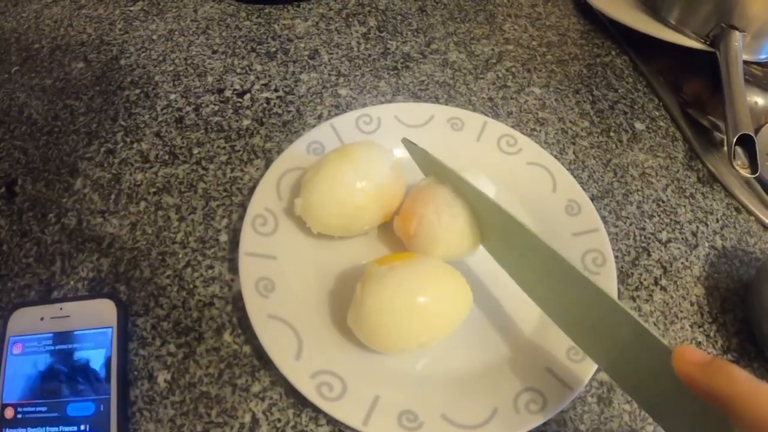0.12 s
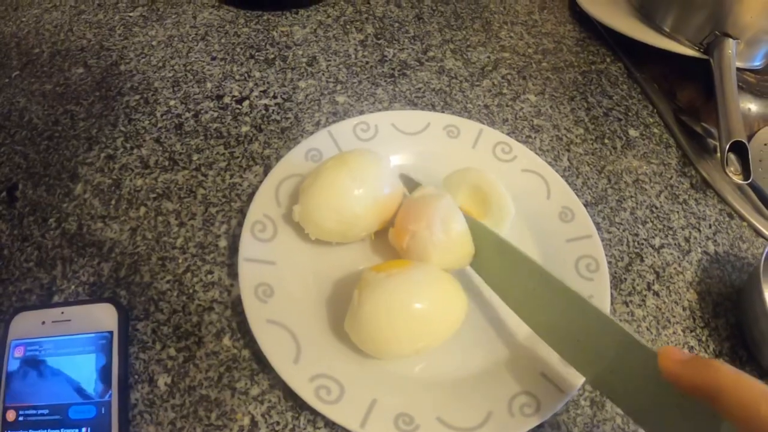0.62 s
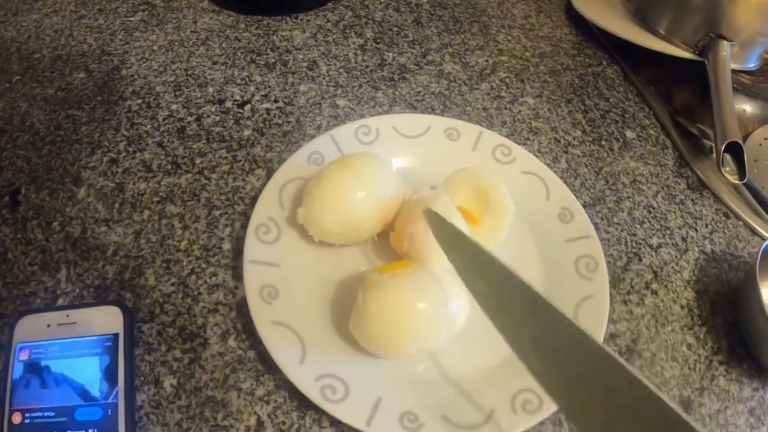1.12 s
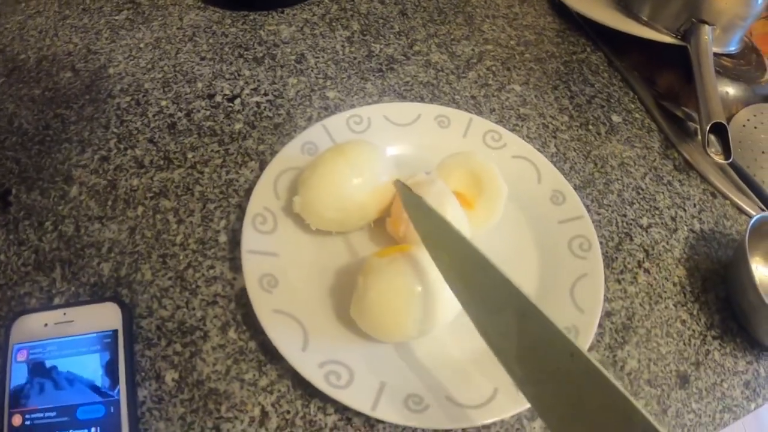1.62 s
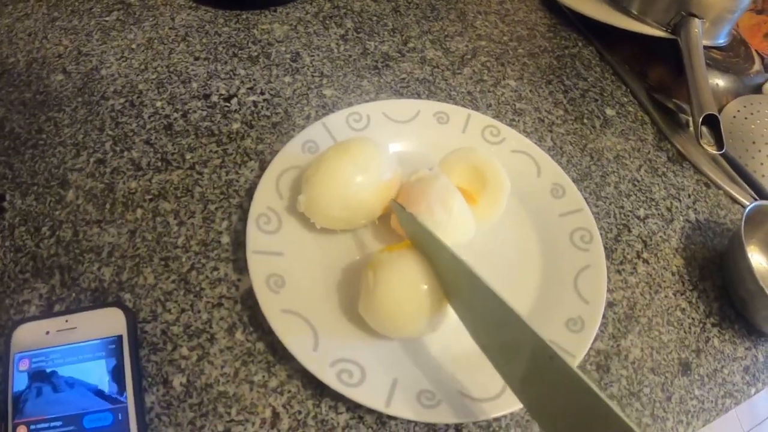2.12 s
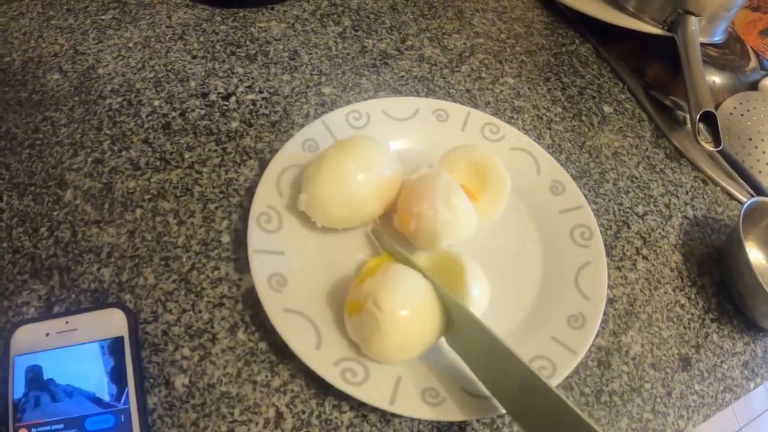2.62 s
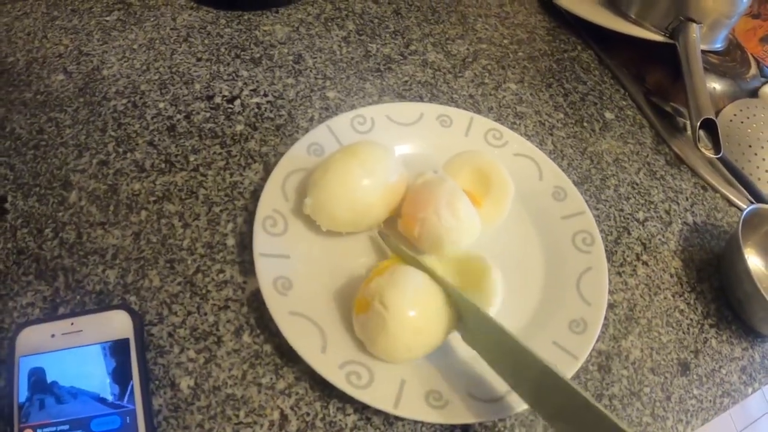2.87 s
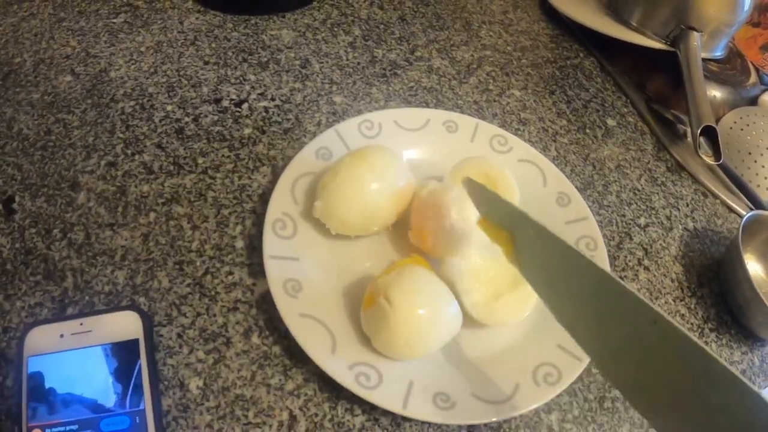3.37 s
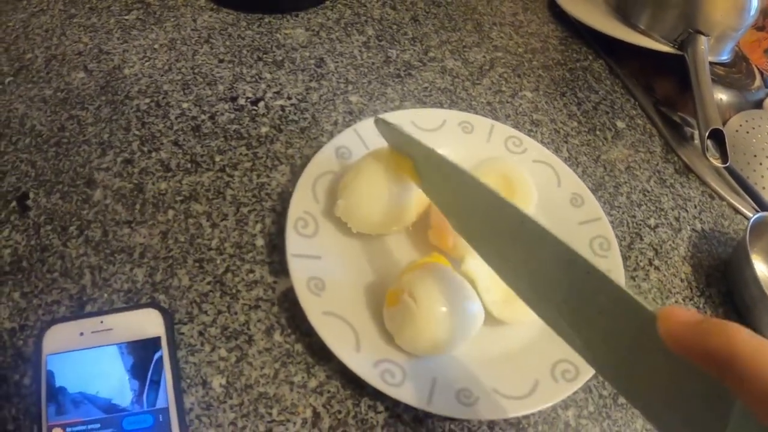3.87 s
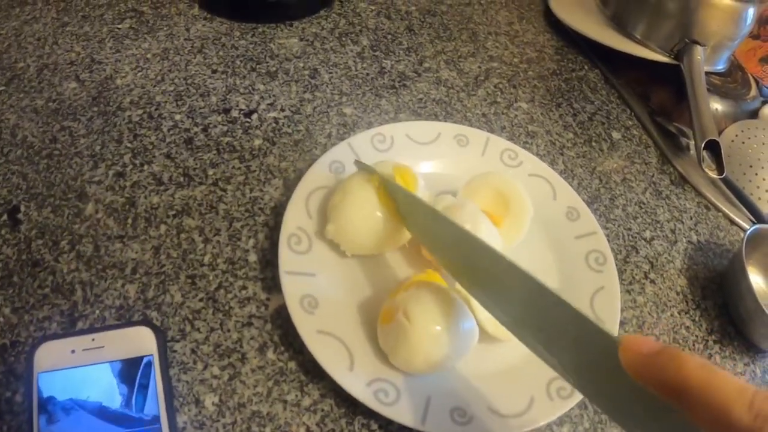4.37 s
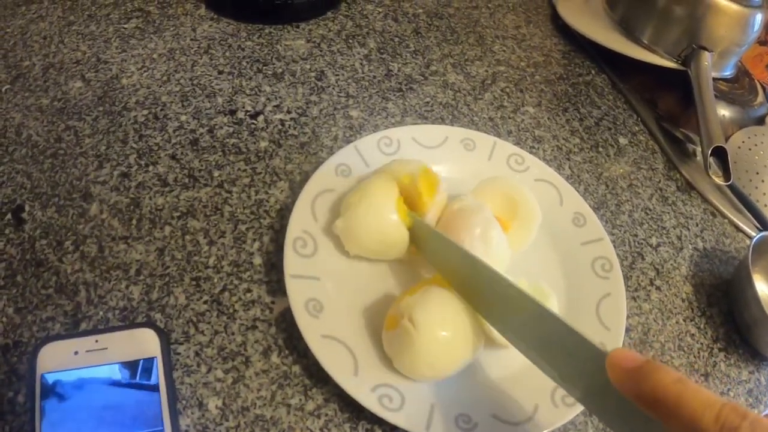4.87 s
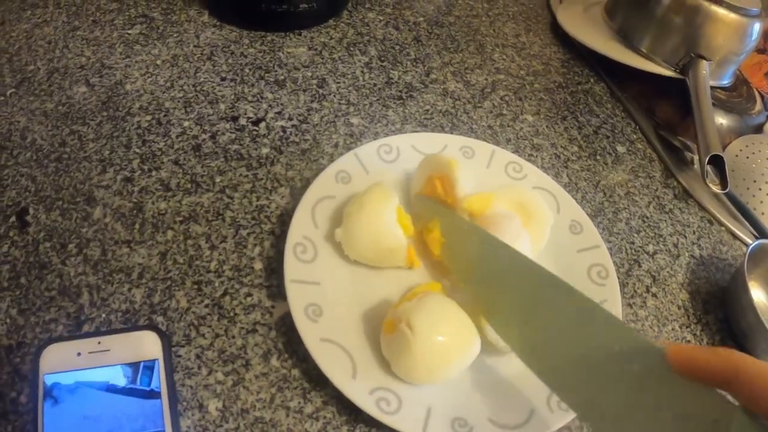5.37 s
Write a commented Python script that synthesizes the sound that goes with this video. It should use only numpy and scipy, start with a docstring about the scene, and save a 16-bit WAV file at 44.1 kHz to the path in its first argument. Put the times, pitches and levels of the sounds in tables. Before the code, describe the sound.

A close, body-worn microphone picks up soft low bumps and rustle over continuous pan sizzle from across the kitchen. A piercing, overloaded plate clink comes early and the frying dips briefly behind it; a faint brush against egg follows. Later come a ringing clink and a quick pair of clinks, then a tiny high squeak and a deep door boom with rattle.

```python
"""Onions sizzle in a pan across a small kitchen: dense noise with crackles and spits, coloured and reverberant.
A knife slices boiled eggs and clinks four times on a ceramic plate: a crack, briefly damped modes and weaker
ringing ones; the blade skids into the first clink, and a ringing noise swells into the third.
At the end a hinge squeaks by stick-slip and a door thumps shut, as low modes under a clatter.
A small microphone worn by the cook rumbles with body movement, clips at full scale and ducks after loud blows."""
import sys
import numpy as np
from scipy import signal
from scipy.fft import rfft, irfft, next_fast_len
from scipy.io import wavfile
from scipy.ndimage import uniform_filter1d

SR = 44100
rng = np.random.default_rng(int(sys.argv[2]) if len(sys.argv) > 2 else 0)


def output_pcm(signal):
    """Save a mono or channel-first signal as 16-bit PCM at the path in sys.argv[1].

    Samples are clipped to [-1, 1] before scaling.
    """
    pcm = np.clip(np.atleast_2d(signal).T, -1, 1) * 32767
    wavfile.write(sys.argv[1], SR, np.round(pcm).astype(np.int16))


def gain_from_db(level_db):
    """Convert decibel levels to linear amplitude factors (20 dB per decade)."""
    decades = np.asarray(level_db, float) / 20
    return 10 ** decades


N = 242764

# spectrum of the frying: f/Hz, relative level/dB
SIZZLE_SPECTRUM = [(120, -24), (270, -6), (480, -12), (750, -11.5), (1320, -2.5), (2000, -3), (3000, -2.5),
                   (4500, -0.5), (5400, 0.5), (6500, -5.5), (7400, -15), (8500, -23), (12400, -23.5),
                   (15400, -34.5)]
# level of the frying as heard, dipping after the first clink and slowly recovering: t/s, level/dB
SIZZLE_LEVEL = [(0.0, -39), (0.25, -39), (0.55, -42.5), (0.8, -43), (1.1, -41.5), (2.7, -39), (3.5, -38.5),
                (4.3, -38.5), (4.95, -35.5), (5.5, -41)]
# tone balance of the crackle, slightly fuller in the bass: f/Hz, level/dB
CRACKLE_TILT = [(300, 3), (3000, 0.5), (9000, 1.0)]
# loudest spits of fat: t/s, relative level/dB
SPITS = [(0.8926, -22.5), (1.477, -20), (1.7076, -21.5), (2.1307, -22), (2.2057, -21), (2.4252, -23.5),
         (2.729, -20.5), (2.915, -24.5), (3.0099, -22.5), (3.2503, -21.5), (3.3292, -20), (3.4253, -18.5),
         (3.4897, -24.5), (3.5295, -23.5), (3.7176, -21), (3.8215, -21.5), (4.1983, -24)]
# treble of a spit against its bass: f/Hz, level/dB
SPIT_TILT = [(1000, 0), (9000, 6.5)]
# knife landings: t/s, blow level/dB, damping time of blade and egg/s, crack level/dB, counter thud level/dB,
# time until the ring is stopped/s
LANDINGS = [(0.3218, 7.5, 0.0045, -16, -38.5, 0.24), (2.6126, -12.5, 0.0087, -14.5, -31, 0.2),
            (4.8731, -12, 0.0078, -18.5, -31.5, 0.13), (5.0478, -15, 0.006, -27, -68, 0.092)]
# plate modes that blade and egg damp at once: f/Hz, level/dB against the blow at each of the four landings,
# which differ as the place struck changes
DAMPED_MODES = [(780, -25.5, -10, -11.5, -18), (1264, -25, -21, -7.5, -36), (1550, -35, -13, -5.5, -29),
                (1820, -50, -29, -22, -2), (2350, -22, -6, -3, -1.5), (2740, 1, 6.5, 2, -0.5),
                (2970, -8, -5.5, -4, -6), (3340, -39, -19, 3, -19), (3647, -18.5, 0.5, -27, -16),
                (4360, -37, -9, -29, -30), (4590, -36, -1.5, -1, -8), (5160, -33, -11, -36, -24)]
# weaker plate modes that ring on: f/Hz, T60/s, level/dB against the blow at each of the four landings
RINGING_MODES = [(851, 1.2, -69, -31, -27, -35), (1570, 0.2, -58, -26, -10, -22),
                 (1860, 0.39, -50, -31, -36, -16.5), (2380, 0.25, -49, -11, -34, -28),
                 (2584, 0.92, -41.5, -37, -43, -48), (2660, 2.9, -36.5, -25, -40, -45),
                 (2680, 1, -38, -31, -32, -45), (2717, 0.63, -36, -22, -41, -38),
                 (2790, 0.57, -39, -27, -40, -38), (2950, 0.51, -40, -24, -18, -40),
                 (3490, 0.22, -58, -31, -12, -20), (3590, 0.5, -63, -15, -34, -40),
                 (3640, .25, -60, -24, -36, -40), (3200, .3, -52, -28, -32, -40),
                 (4360, 1.1, -46, -40, -43, -40), (4600, 0.8, -50, -41, -23, -39),
                 (4663, 0.22, -51, -23.5, -23, -28), (6020, 0.8, -44, -43, -24, -40),
                 (6160, 0.4, -55, -25, -43, -45), (7300, 0.15, -70, -36, -34, -50),
                 (9300, 0.093, -72, -31, -45, -55), (10600, 1.2, -87, -62, -60, -60)]
# spectrum of the crack: f/Hz, relative level/dB
CRACK_SPECTRUM = [(200, -49), (700, -16.5), (2500, 8), (5000, 5), (6500, -4.5), (8000, -43)]
# spectrum of the counter's thud: f/Hz, relative level/dB
COUNTER_SPECTRUM = [(100, -1), (250, 14), (450, 12), (900, 6), (1600, 7.5), (3000, -49)]
# noise growing into a clink, first a skid of the blade on the glaze, later a faint ringing swell:
# start t/s, end t/s, level at the end/dB, rise/dB
SWELLS = [(0.292, 0.3245, -9.5, 37), (4.855, 4.887, -31, 6)]
# narrow rings in that noise: f/Hz, bandwidth/Hz, relative level/dB in the skid, relative level/dB in the later swell
SWELL_RINGS = [(2780, 1000, 2.5, 0), (4160, 78, -4, -14), (4440, 840, -1, -11), (4405, 120, -1, 6),
               (6570, 150, -3, -16), (6520, 170, 9.5, -25)]
# the blade brushes an egg: t/s, level/dB, T60/s
TOUCH = (0.853, -41, .22)
# spectrum of that brush: f/Hz, relative level/dB
BRUSH_SPECTRUM = [(400, -32), (800, 0), (1400, 0), (2200, -6), (4000, -28)]
# radiation of the slips by door and hinge plate: f/Hz, level/dB
HINGE_RADIATION = [(995, -32), (1012, -30), (1042, -48), (1054, -30), (1085, -28), (1130, -38), (1995, -38),
                   (2012, -30), (2034, -20), (2066, -20), (2108, -30), (2165, -27), (2240, -42),
                   (2990, -36), (3045, -23), (3100, -26), (3155, -45), (3210, -33), (3270, -50),
                   (4080, -40), (4280, -36), (4360, -52), (5085, -37), (5250, -40), (5370, -52)]
# door meets frame and rebounds: t/s, level/dB
SLAMS = [(5.293, -2), (5.328, -4.5), (5.354, -2.5)]
# modes of panel and room: f/Hz, level/dB against the slam, T60/s
DOOR_MODES = [(12.6, -22, .9), (31.7, -13.5, 1.33), (54, -3, 0.39), (67, -10, 0.39), (84.6, -16, 0.31),
              (99.3, -9.5, 0.83), (123.2, -15, 0.44), (171, -38, 1.8), (247, -36, 0.53), (270, -25.5, 0.52),
              (318, -24, 0.37), (370, -30, 0.33), (471.5, -21.5, 0.37), (975, -18, 0.23), (1046, -18, 0.23),
              (1710, -8.5, 0.085)]
# spectrum of the clatter: f/Hz, relative level/dB
RATTLE_SPECTRUM = [(71, -27), (120, -6.5), (160, -5), (567, -12), (908, -15.5), (1010, -11), (1330, -15),
                   (2240, -20.5), (3040, -19), (6270, -31), (9000, -62), (11700, -93), (19800, -120)]
# jolts of the microphone mount: start t/s, length/s, wobble level/dB, rustle level/dB
JOLTS = [(0.135, .2, -30, -40.5), (0.304, 0.091, -38, -33.5), (0.362, 0.19, -37.5, -47),
         (0.578, 0.12, -36.5, -66), (1.088, .2, -32, -45.5), (1.35, 0.22, -32.5, -50),
         (1.608, 0.25, -31.5, -50.5), (1.852, .08, -37, -59), (1.956, 0.065, -38, -53),
         (2.018, .12, -35.5, -54), (2.145, 0.12, -38.5, -76), (2.303, 0.11, -41, -68),
         (3.043, .1, -39.5, -53), (3.429, .08, -47, -51.5), (3.589, .09, -46, -67), (3.887, .1, -42.5, -59),
         (4.335, .12, -43, -68), (4.5, .1, -47, -48), (4.75, 0.1, -45.5, -54), (4.85, .1, -53, -41.5)]
# spectrum of the low body thud: f/Hz, relative level/dB
THUD_SPECTRUM = [(5, -4), (18, 7.0), (35, 14.0), (55, -11.0), (80, -19), (200, -96)]
# spectrum of the rustle: f/Hz, relative level/dB
RUSTLE_SPECTRUM = [(30, -6), (70, -6), (100, 1.5), (160, -2.0), (350, -14.5), (900, -43.5)]
# reverberation time of the kitchen: f/Hz, T60/s
ROOM_T60 = [(250, 1), (700, 0.96), (2500, 1), (6000, 0.64), (12000, 0.19)]

SQUEAK_S, SQUEAK_LENGTH_S, SQUEAK_RISE_S, SQUEAK_FALL_S = 5.228, .097, .015, .012
SLIP_END_HZ, SLIP_DROP_HZ, SLOWING_S = 960, 165, .065
SLIP_JITTER, GRIP_DB = 0.0059, 2  # rms fraction of the slip rate; rms level change
RATTLE_DB, RATTLE_GROWTH_DB, RATTLE_PEAK_S, RATTLE_T60_S = -14, 10.5, 5.338, 0.56
MOUNT_HZ, MOUNT_SPREAD, JOLT_SKEW = 33.9, 0.052, 0.75  # centre; fraction either way; below 1 peaks early
UPPER_HZ, UPPER_DB = 101.4, -1.5  # second, higher wobble; its level is relative to the rustle
CALM_THUD_DB, CALM_RUSTLE_DB, LUMPS_DB = -49, -55.5, 2.5  # movement noise without jolts
EDGE_HZ = 15650  # upper band limit


def evened(x):
    """Normalisation of signal power: scales to rms 1."""
    return x / np.sqrt(np.mean(x ** 2) + 1e-20)


def curve(rows, column=1):
    """Linear interpolation in time: a table column at every sample."""
    rows = np.asarray(rows)
    return np.interp(np.arange(N) / SR, rows[:, 0], rows[:, column])


def read(points, hz):
    """Interpolation of a spectrum on a logarithmic frequency axis."""
    f, value = np.transpose(points)
    return np.interp(np.log(hz + 1), np.log(f + 1), value)


def colour(x, points):
    """Linear filtering: multiplies the spectrum of x by a response in dB."""
    size = next_fast_len(len(x))
    response = gain_from_db(read(points, np.fft.rfftfreq(size, 1 / SR)))
    return irfft(rfft(x, size) * response, size)[:len(x)]


def add(mix, s, sound):
    """Superposition: mixes a sound in from time s."""
    part = mix[round(s * SR):][:len(sound)]
    part += sound[:len(part)]


def ring(hz, db, t60, phase=0, length=.7):
    """Free vibration of a damped mode: a sinusoid with exponential decay."""
    t = np.arange(round(length * SR)) / SR
    return gain_from_db(db - 60 * t / t60) * np.sin(2 * np.pi * hz * t + phase)


def sizzle():
    """Random superposition: dense bursting bubbles blur to patchy hiss; larger ones crackle and spit."""
    frames = N // 64 + 5
    real, imaginary, patches = rng.standard_normal((frames, 129, 3)).T
    patches = uniform_filter1d(patches, size=6, axis=0)  # across frequency
    patches = evened(uniform_filter1d(patches, size=40, axis=1))  # across time
    flicker = evened(uniform_filter1d(rng.standard_normal(frames), size=30))
    spectrum = (real + 1j * imaginary) * gain_from_db(0.3 * patches + 1.66 * flicker)
    hiss = evened(signal.istft(spectrum, nperseg=256, noverlap=192)[1][:N])

    pop_sizes = gain_from_db(4.3 * np.minimum(rng.exponential(1, N), 4))
    pops = pop_sizes * (rng.random(N) < 250 / SR)  # 250 a second on average
    t = np.arange(1500) / SR
    burst = gain_from_db(-60 * t / 0.032) + 0.086 * gain_from_db(-60 * t / 0.1)
    pop_power = signal.oaconvolve(pops ** 2, burst ** 2)[:N]
    crackle = evened(np.sqrt(abs(pop_power)) * rng.standard_normal(N))
    tinted = colour(crackle, CRACKLE_TILT)
    out = evened(colour(hiss + 0.48 * tinted, SIZZLE_SPECTRUM)) * gain_from_db(curve(SIZZLE_LEVEL))

    t = np.arange(6000) / SR
    decay = 1.12 * gain_from_db(-60 * t / 0.026) + 0.28 * gain_from_db(-60 * t / 0.21)  # burst and fizzing tail
    fizz = decay * (1 - np.exp(-t / 0.00059))
    for (s, db), noise in zip(SPITS, rng.standard_normal((len(SPITS), len(t)))):
        spit = evened(colour(colour(noise, SIZZLE_SPECTRUM), SPIT_TILT))
        add(out, s, gain_from_db(db - 10.5) * spit * fizz)
    return out


def plate():
    """Modal damping by contact: a crack and modes die in milliseconds; many weaker modes ring on over a thud."""
    out = np.zeros(N)
    t = np.arange(round(.7 * SR)) / SR
    rise = 1 - np.exp(-(t / 0.00076) ** 2)  # the edge lands softly through egg
    for k, (s, blow_db, free, crack_db, thud_db, stop) in enumerate(LANDINGS):
        crack, thud, *flutter = rng.standard_normal((2 + len(RINGING_MODES), len(t)))
        contact = np.exp(-(t / free) ** 3)
        damped = sum(ring(hz, dbs[k], 0.086, phase=m ** 2)
                     for m, (hz, *dbs) in enumerate(DAMPED_MODES))
        # random flutter broadens each ring, like the kitchen's reverberant tail
        flutter = uniform_filter1d(uniform_filter1d(flutter, size=160), size=160)
        flutter = .5 + .85 * evened(flutter)
        ringing = sum(ring(hz, dbs[k], t60, phase=m ** 2) * flutter[m]
                      for m, (hz, t60, *dbs) in enumerate(RINGING_MODES))
        stopped = ringing * np.exp(-(t / stop) ** 4)
        add(out, s, gain_from_db(blow_db) * rise * (damped * contact + stopped))
        crack_decay = contact + 0.084 * gain_from_db(-60 * t / 0.45)
        add(out, s, evened(colour(crack, CRACK_SPECTRUM)) * gain_from_db(crack_db) * rise * crack_decay)
        thud_shape = gain_from_db(thud_db - 60 * t / 0.38) * (1 - np.exp(-t / 0.0059))
        add(out, s, evened(colour(thud, COUNTER_SPECTRUM)) * thud_shape)
    return out


def swells():
    """Resonant filtering of growing noise: the blade's skid into the first clink, a swell into the third."""
    out = np.zeros(N)
    for k, (start, end, end_db, rise_db) in enumerate(SWELLS):
        noise = rng.standard_normal(2000)[:round((end - start) * SR)]
        rings = sum(gain_from_db(dbs[k]) * evened(signal.filtfilt(*signal.iirpeak(hz, hz / width, SR), noise))
                    for hz, width, *dbs in SWELL_RINGS)
        add(out, start, evened(rings) * gain_from_db(end_db + np.linspace(-rise_db, 0, len(noise))))
    return out


def touch():
    """Weak friction: a soft, dull brush of decaying noise around one kilohertz."""
    out = np.zeros(N)
    s, db, t60 = TOUCH
    t = np.arange(8000) / SR
    brush = evened(colour(rng.standard_normal(len(t)), BRUSH_SPECTRUM))
    add(out, s, brush * gain_from_db(db - 60 * t / t60) * (1 - np.exp(-t / 0.0023)))
    return out


def squeak():
    """Stick-slip: harmonics of a slip rate that falls as the door slows sweep through its resonances."""
    out, t = np.zeros(N), np.arange(0, SQUEAK_LENGTH_S, 1 / SR)
    wander = uniform_filter1d(rng.standard_normal((6, 6000)), size=200)
    jitter, *grip = evened(wander)[:, :len(t)]
    hz = SLIP_END_HZ + SLIP_DROP_HZ * np.exp(-t / SLOWING_S)
    turns = np.cumsum(hz * (1 + SLIP_JITTER * jitter)) / SR
    stack = np.zeros(len(t))
    for k, wobble in enumerate(grip, start=1):  # uneven grip on each of five harmonics
        level = gain_from_db(read(HINGE_RADIATION, k * hz) + GRIP_DB * wobble)
        stack += np.sqrt(2) * level * np.sin(2 * np.pi * k * turns)
    rise = np.minimum(t / SQUEAK_RISE_S, 1) ** 2
    fall = np.minimum(t[::-1] / SQUEAK_FALL_S, 1)
    add(out, SQUEAK_S, stack * rise * fall)
    return out


def door():
    """Impact excitation: low panel and room modes boom at each blow, under a clatter of frame and latch."""
    out = np.zeros(N)
    boom = sum(ring(hz, db, t60, phase=m ** 2) for m, (hz, db, t60) in enumerate(DOOR_MODES))
    boom *= 1 - np.exp(-(np.arange(len(boom)) / SR / 0.015) ** 2)  # swells in
    for s, db in SLAMS:
        add(out, s, gain_from_db(db) * boom)
    t = np.arange(N) / SR
    first = SLAMS[0][0]
    onset = np.clip((t - first) / 0.0078, 0, 1)
    noise, lumps = rng.standard_normal((2, N))
    lumps = gain_from_db(1.1 * evened(uniform_filter1d(lumps, size=200)))
    # the clatter grows towards the rebound, then dies
    late = t - RATTLE_PEAK_S
    growth_db = RATTLE_GROWTH_DB * late / (RATTLE_PEAK_S - first)
    level_db = RATTLE_DB + np.where(late < 0, growth_db, -60 * late / RATTLE_T60_S)
    clatter = evened(colour(noise * lumps, RATTLE_SPECTRUM)) * gain_from_db(level_db)
    return out + clatter * onset


def rumble():
    """Structure-borne vibration: body jolts wobble the mount and rustle, over lumpy low noise."""
    low, high, lumps = rng.standard_normal((3, N))
    thud = evened(colour(low, THUD_SPECTRUM))
    rustle = evened(colour(high, RUSTLE_SPECTRUM))
    lumps = uniform_filter1d(uniform_filter1d(lumps, size=4000, mode="wrap"), size=2000)
    lumps = gain_from_db(LUMPS_DB * evened(lumps))
    wobble, stir = np.zeros((2, N))
    for (s, length, wobble_db, rustle_db), (detune, turn) in zip(JOLTS, rng.random((len(JOLTS), 2))):
        t = np.arange(0, length, 1 / SR)
        arch = np.sin(np.pi * (t / length) ** JOLT_SKEW)
        hz = MOUNT_HZ * (1 + MOUNT_SPREAD * (2 * detune - 1))
        upper_hz = UPPER_HZ * hz / MOUNT_HZ
        add(wobble, s, np.sqrt(2) * gain_from_db(wobble_db) * arch * np.sin(2 * np.pi * (hz * t + turn)))
        add(wobble, s, gain_from_db(rustle_db + UPPER_DB) * arch * np.sin(2 * np.pi * (upper_hz * t + turn)))
        add(stir, s, gain_from_db(rustle_db) * arch)
    return wobble + thud * gain_from_db(CALM_THUD_DB) * lumps + rustle * (gain_from_db(CALM_RUSTLE_DB) * lumps + stir)


def room(x):
    """Diffuse reverberation: sparse taps of random sign, each band decaying at its own rate."""
    taps = np.zeros(SR)
    starts = np.arange(300, SR - 20, 20)  # one tap in every 20 samples
    taps[starts + rng.integers(0, 20, len(starts))] = rng.choice([-1., 1.], len(starts))
    hz, t, z = signal.stft(taps, SR, nperseg=256)
    decay = gain_from_db(-60 * t / read(ROOM_T60, hz)[:, None])
    tail = signal.istft(z * decay, SR, nperseg=256)[1]
    return signal.fftconvolve(x, tail / np.linalg.norm(tail))[:N]


def scene():
    """Direct-to-reverberant ratio as distance: near plate with little room, pan and hinge with much."""
    near, hinge, pan = plate() + swells() + touch(), squeak(), sizzle()
    tail = room(gain_from_db(-31) * near + gain_from_db(-16) * hinge + gain_from_db(-10) * pan)
    return (near + hinge + pan + tail + door() + rumble())[None]


def band_limit(x):
    """A steep low-pass at the top of the band."""
    return signal.sosfilt(signal.butter(12, 15600, fs=SR, output="sos"), x)


def record(dry):
    """Dynamic compression: gain falls a little late and recovers slowly; peaks clip; the band is limited."""
    power = signal.lfilter([1 / 250], [1, 1 / 250 - 1], dry[0] ** 2)
    power_db = 10 * np.log10(abs(power) + 1e-12)
    fall = np.arange(N) * 10.8 / SR  # the held level falls 10.8 dB a second
    held_db = np.maximum.accumulate(power_db + fall) - fall
    over_db = np.maximum(held_db + 10.0, 0)  # excess above -10 dB
    late_db = signal.lfilter([1 / 400], [1, 1 / 400 - 1], over_db)
    clipped = np.clip(dry / gain_from_db(.5 * late_db), -1, 1)  # half the excess is taken off
    edge = signal.firwin(255, EDGE_HZ, fs=SR)[None]
    finished = signal.oaconvolve(clipped, edge, "same")
    return band_limit(finished)


dry = scene()
out = record(dry)
output_pcm(out)
```